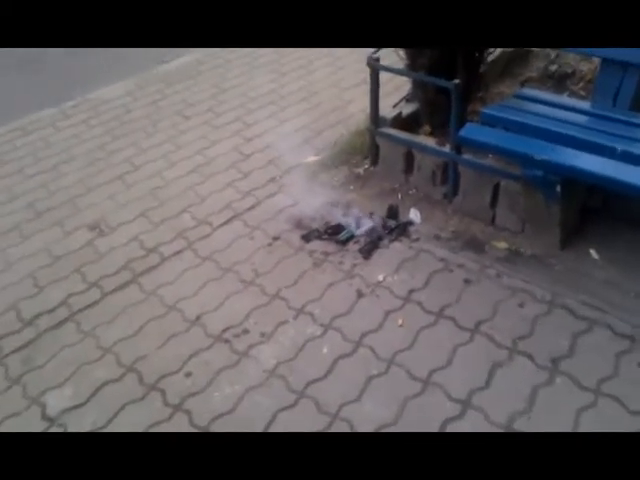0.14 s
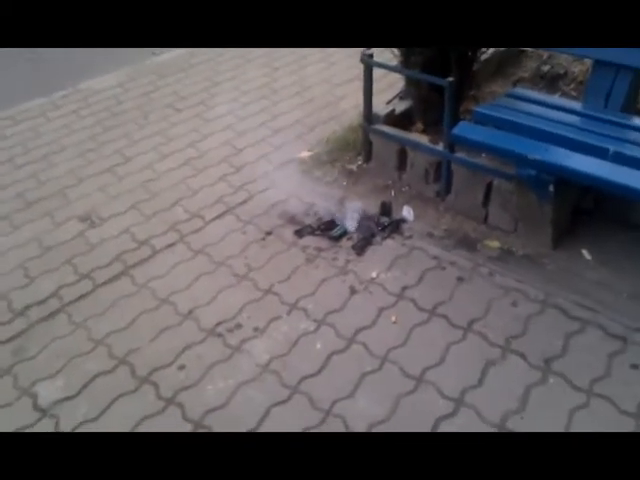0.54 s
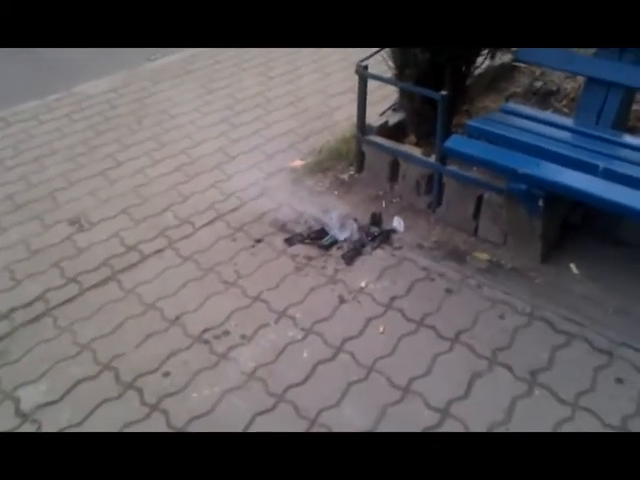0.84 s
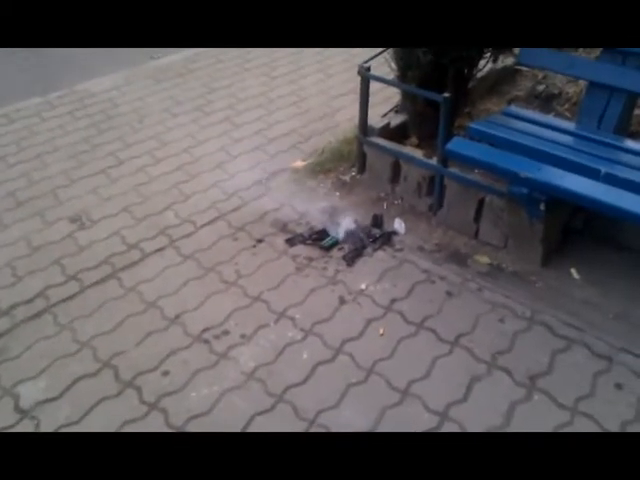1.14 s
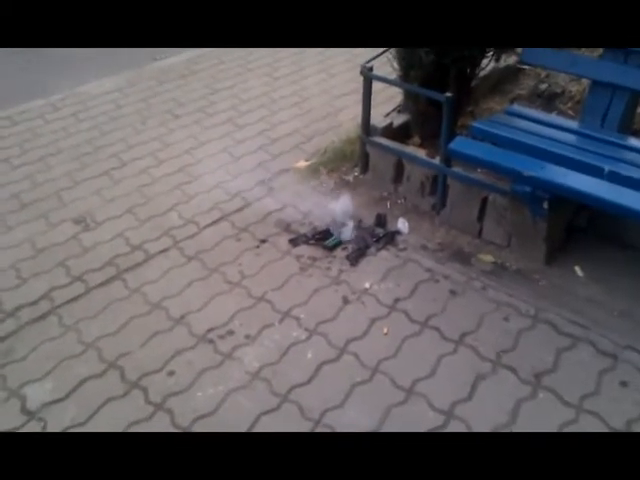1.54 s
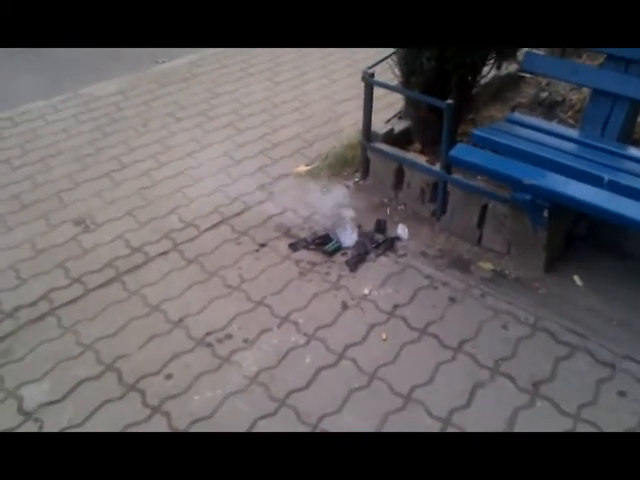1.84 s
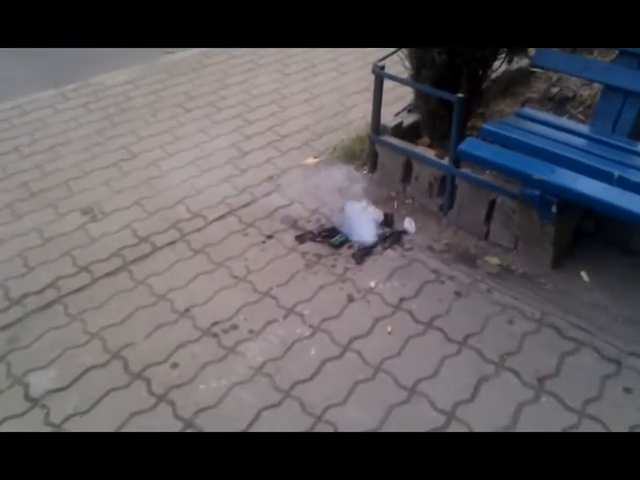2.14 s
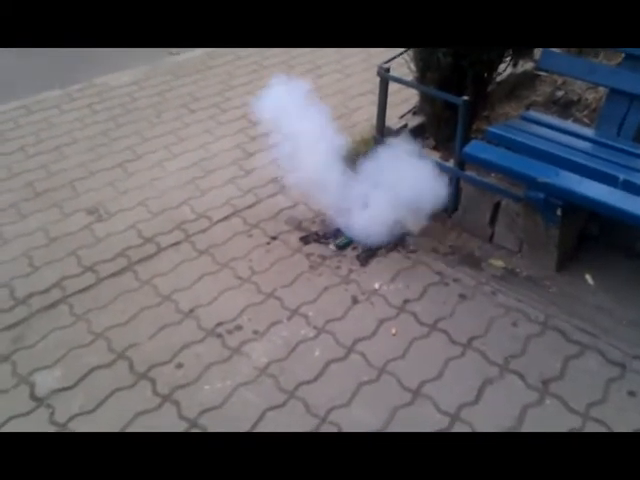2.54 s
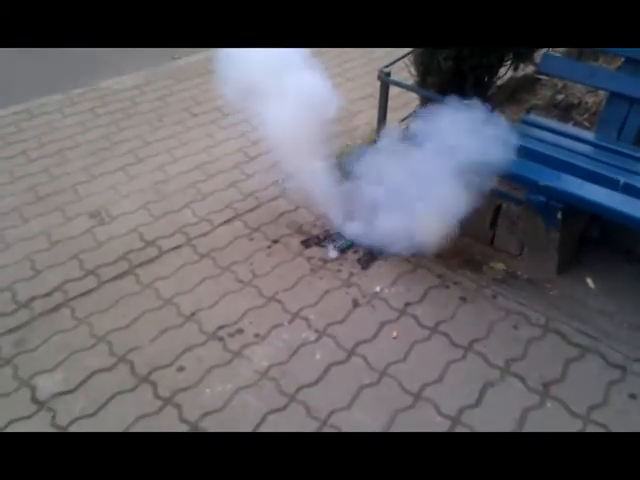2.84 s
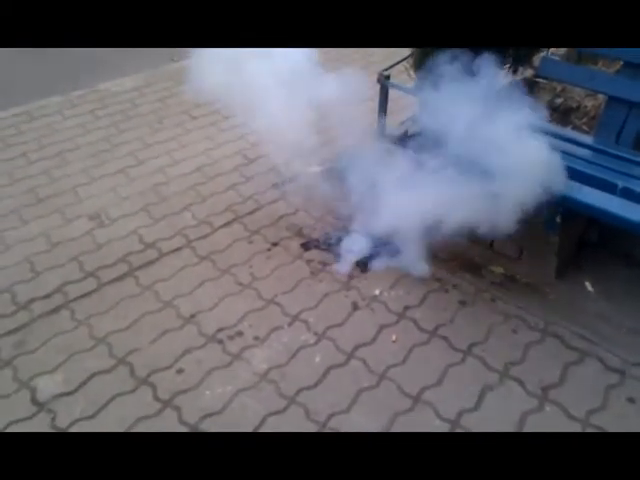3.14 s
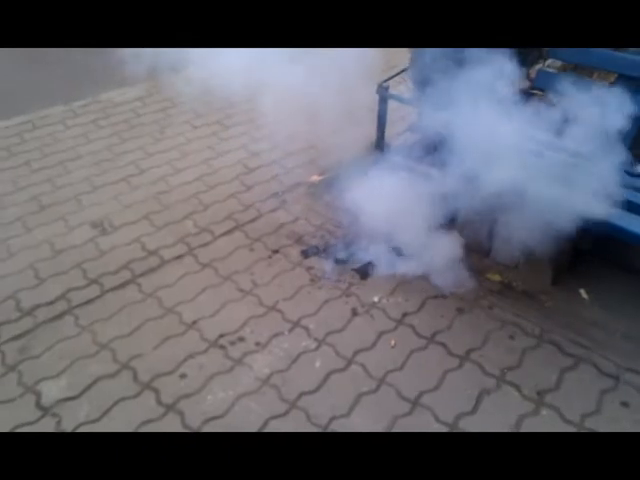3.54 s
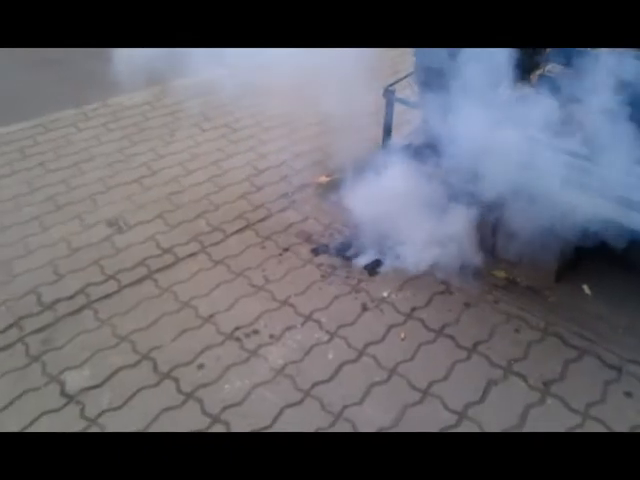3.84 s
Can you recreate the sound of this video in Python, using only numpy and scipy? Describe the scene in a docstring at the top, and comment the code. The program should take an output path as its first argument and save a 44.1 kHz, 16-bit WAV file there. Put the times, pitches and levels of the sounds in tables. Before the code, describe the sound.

A bright, spitting hiss of gas escapes from a burnt battery on the pavement, then fades steadily, dotted with brief pops. Underneath are a faint hum of far traffic and a slight wind rumble on the microphone.

```python
"""On outdoor paving, a smouldering battery vents gas in a sputtering jet that dies away. Turbulence gives a
hiss over a low roar, both roughened by spitting grit, and now and then a pop bursts out; nearby surfaces return
a short echo. The treble is wide, and a thin tone near 10.5 kHz follows its level. Far traffic hums behind, and
wind brushes the microphone, whose response peaks near 4.5 kHz."""
import sys
import numpy as np
from scipy import signal
from scipy.fft import rfft, irfft
from scipy.io import wavfile
from scipy.ndimage import uniform_filter1d, map_coordinates

SR = 44100
rng = np.random.default_rng(int(sys.argv[2]) if len(sys.argv) > 2 else 0)


def wav_out(sig):
    """Save sig, one row per channel (or a flat mono array), as 16-bit PCM at SR to the path in sys.argv[1]."""
    wavfile.write(sys.argv[1], SR, np.round(np.clip(np.atleast_2d(sig).T, -1, 1) * 32767).astype(np.int16))


N = 176400
TIME_S, BIN_HZ = np.arange(N) / SR, np.fft.rfftfreq(N, 1 / SR)

# Spectrum of the weak jet and of the pops' upper band: frequency_hz, gain_db
WEAK_JET_SPECTRUM = [(1060, -54), (1800, -14.5), (1900, -45), (1940, -12), (2120, -19), (2240, -11.5),
                     (2570, -9), (2630, -13.5), (2770, -7), (3120, -8.5), (3380, -5), (3600, -8),
                     (3710, -2.5), (3950, 3), (4180, -1.5), (4620, 2), (5040, -5), (5500, -3), (5820, -8),
                     (6720, -11), (8000, -25), (10400, -46), (17600, -120)]
# Spectrum of the roar and of the pops' lower band: frequency_hz, gain_db
ROAR_SPECTRUM = [(35, -65), (60, -18), (233, -5.5), (275, -9), (306, -5), (534, -9.5), (689, 1), (1040, -5),
                 (1680, -2), (2070, -8), (2200, -3), (2860, -24.5), (4840, -120)]


def vent(grit):
    """Turbulent mixing noise: one sputtering flow drives the hiss, the whistles and a low roar."""
    # Uneven decay of the flow: time_s, jet_level_db, roar_re_jet_db
    flow_levels = [(0.0, -16.5, -16), (0.052, -15.5, -19), (0.094, -21, -11.5), (0.122, -16.5, -20),
                   (0.17, -19.5, -14), (0.354, -14, -14.5), (0.42, -16, -18.5), (0.434, -14, -14),
                   (0.496, -15, -11), (0.738, -19, -19), (0.748, -22, -10.5), (0.794, -17, -15.5),
                   (0.822, -27, -15), (0.86, -20.5, -15.5), (0.912, -20.5, -20), (0.928, -22.5, -13),
                   (0.942, -17, -13.5), (1.012, -20.5, -17.5), (1.054, -18.5, -12.5), (1.15, -21, -18),
                   (1.164, -16, -12), (1.202, -24.5, -18), (1.264, -14.5, -12), (1.288, -27.5, -12),
                   (1.296, -17.5, -13), (1.472, -25, -13.5), (1.476, -22, -18), (1.538, -26, -10),
                   (1.58, -17.5, -17), (1.59, -25, -12.5), (1.7, -25.5, -16), (1.75, -27.5, -16.5),
                   (2.3, -28.5, -18.5), (2.76, -34, -16), (2.79, -37, -16), (2.94, -39.5, -13.5),
                   (2.986, -37.5, -27), (3.012, -39, -18), (3.346, -39.5, -18), (3.6, -42.5, -16),
                   (3.74, -44, -12), (3.758, -43, -12), (3.88, -43.5, -22)]
    jet_db, roar_db = curves(flow_levels)
    flow = amp(jet_db)
    jet = jet_hiss(flow, grit) + whistles(flow)
    roar = flow * amp(roar_db) * unit(patchy_noise(spread_db=1.1) + 1.1 * grit)
    return jet + coloured(roar, ROAR_SPECTRUM)


def jet_hiss(flow, grit):
    """Eddies radiate broadband noise, whose spectrum shifts as the flow weakens."""
    # Strong jet, including the microphone's peak near 4.5 kHz: frequency_hz, gain_db
    strong_spectrum = [(1060, -41), (1800, -40), (2080, -23), (2400, -10), (3140, -8), (3400, -3),
                       (3690, -2), (3880, 0), (4560, 4.5), (5100, 2.5), (8000, -23), (10400, -30),
                       (17600, -120)]
    hiss = flow * unit(patchy_noise(spread_db=1.5) + grit)
    weak = np.interp(TIME_S, (1.06, 1.9), [0, 1])
    return coloured(hiss * (1 - weak), strong_spectrum) + coloured(hiss * weak, WEAK_JET_SPECTRUM)


def whistles(flow, gain_db_per_s=2.6):
    """Narrowband noise is heard as pitch: three bands of the vent fade more slowly than the jet."""
    # Whistle bands: pitch_hz, width_hz, initial_level_re_jet_db
    bands = [(3850, 60, -21), (5480, 90, -27), (3320, 70, -30)]
    sound = np.zeros(N)
    for pitch_hz, width_hz, level_db in bands:
        peak = 1 / (1 + ((BIN_HZ - pitch_hz) / (width_hz / 2)) ** 2)
        band = unit(irfft(rfft(rng.standard_normal(N)) * peak, N))
        sound += flow * amp(level_db + gain_db_per_s * TIME_S) * band
    return sound


def grit_spits(rate_per_s=500, decay_s=.0003):
    """Shot noise: grit thrown out at random instants makes tiny bursts of very unequal size."""
    onsets = rng.random(N) < rate_per_s / SR
    size_db = 3.5 * np.minimum(rng.exponential(size=N), 4.5)
    envelope = signal.fftconvolve(onsets * amp(size_db), np.exp(-TIME_S[:200] / decay_s))[:N]
    return unit(envelope * rng.standard_normal(N))


def fizz(grit, tone_hz=10499, right_lag_rad=.96):
    """Interaural differences of phase and level spread the vent's treble; a thin tone follows its level."""
    # Decay of the treble: time_s, level_db
    levels = [(0.0, -30), (0.21, -30), (0.34, -26), (0.42, -31), (0.43, -25.5), (0.63, -33), (0.89, -34),
              (0.98, -29), (0.99, -34.5), (1.07, -30.5), (1.15, -35.5), (1.16, -31), (1.19, -39),
              (1.25, -32.5), (1.53, -40), (1.57, -37), (1.63, -39), (2.43, -44.5), (2.87, -53),
              (3.41, -54.5), (3.77, -62), (4.0, -59)]
    # Treble of the strong flow: frequency_hz, gain_db
    bright_spectrum = [(4590, -48), (7800, -1.5), (8170, -8), (9140, 3), (10300, 2), (12200, -8),
                       (13600, -5), (14400, -19.5)]
    # Treble of the dying flow: frequency_hz, gain_db
    dull_spectrum = [(4590, -35), (7800, -6), (8210, -5.5), (10400, 1), (11300, -10), (13700, -14),
                     (14400, -14)]
    # Bands in antiphase at the two ears: frequency_hz, gain_db
    side_spectrum = [(7200, -56), (7350, -1), (8600, 11), (9100, -22), (9200, -52), (9550, -55), (9700, -7),
                     (10500, 14.5), (11350, 4), (11500, -94)]
    envelope = amp(curves(levels)[0])
    sizzle = envelope * unit(patchy_noise(spread_db=2.3) + 0.25 * grit)
    dull = np.interp(TIME_S, (1.7, 4.2), [0, 1])
    mid = coloured(sizzle * (1 - dull), bright_spectrum) + coloured(sizzle * dull, dull_spectrum)
    side = coloured(envelope * amp(-6.5) * patchy_noise(spread_db=2.5), side_spectrum)
    phase = 2 * np.pi * tone_hz * TIME_S
    tone = np.array([np.sin(phase), amp(4.5) * np.sin(phase - right_lag_rad)])
    return mid + np.array([side, -side]) + envelope * amp(-11.5) * tone


def pops(rise_s=.0005, crack_s=.002, puff_s=.012):
    """A brief transient is broadband: each pop has a sharp crack, a ragged puff and a low push."""
    # Pops of the vent: start_s, level_db, low_band_re_level_db
    events = [(0.4324, -9.5, -5.5), (0.4362, -6.5, -22), (0.446, -9.5, -10), (0.5064, -9, -23),
              (0.5531, -19, -23), (0.5658, -15, -18), (0.843, -13, -7.5), (0.9264, -10.5, -16),
              (1.0532, -14.5, -10.5), (1.3588, -12.5, -14.5), (1.478, -13.5, -13.5), (1.5405, -20, -7),
              (2.0624, -28, -15), (2.7397, -22, -14), (2.8758, -26.5, -10.5), (2.917, -28, -8.5),
              (3.1477, -28, -17), (3.658, -30.5, -8.5), (3.6675, -27, -14), (3.6814, -39, -15),
              (3.921, -25.5, -9.5), (3.9334, -32, -15)]
    # Low push of a pop: frequency_hz, gain_db
    push_spectrum = [(40, -10), (120, 13), (350, 0), (900, -9), (2500, -32)]
    high, low, push = np.zeros((3, N))
    for start_s, level_db, low_db in events:
        age_s = np.maximum(TIME_S - start_s, 0)
        decay = np.exp(-age_s / crack_s) + amp(-12) * np.exp(-age_s / puff_s)
        envelope = amp(level_db) * (1 - np.exp(-age_s / rise_s)) * decay
        high += envelope
        low += envelope * amp(low_db)
        push[round(start_s * SR)] = amp(level_db + low_db + 3)
    ragged = amp(2.9 * wobble(270)) * np.sign(rng.standard_normal(N))
    bursts = coloured(high * ragged, WEAK_JET_SPECTRUM) + coloured(low * ragged, ROAR_SPECTRUM)
    return bursts + coloured(push, push_spectrum)


def yard_echo(direct, t60_s=.18, gap_s=.003, level_db=-5):
    """Reflections from paving, kerb and bench merge into a short, exponentially decaying tail."""
    # Small surfaces return little bass: frequency_hz, gain_db
    spectrum = [(300, -25), (1200, 0), (20000, 0)]
    t = TIME_S[:int(t60_s * SR)]
    tail = (t > gap_s) * amp(-60 * t / t60_s) * coloured(rng.standard_normal(N), spectrum)[:len(t)]
    response = amp(level_db) * tail / np.linalg.norm(tail)
    response[0] = 1  # direct path
    return signal.fftconvolve(direct, response)[:N]


def traffic():
    """Distant vehicles add incoherently into a low, gently wavering hum."""
    # Far traffic: frequency_hz, gain_db
    spectrum = [(15, -65), (25, -20), (71, -0.5), (108, -5.5), (209, -10), (271, -20), (389, -11),
                (1610, -12), (3000, -18.5), (3900, -41), (6600, -120)]
    return amp(-53 + 1.6 * wobble(3.38)) * coloured(patchy_noise(spread_db=1.8), spectrum)


def wind():
    """Turbulent pressure fluctuations on the microphone are heard as a low rumble."""
    # Gusts: time_s, level_db
    gusts = [(0.0, -63), (0.07, -45), (0.1, -56), (1.2, -61), (1.35, -48), (1.51, -60), (1.56, -46.5),
             (1.86, -47), (1.96, -62), (2.25, -49), (2.47, -56), (4.0, -57)]
    # Wind rumble: frequency_hz, gain_db
    spectrum = [(10, -19), (30, 0), (55, -8), (100, -27)]
    return amp(curves(gusts)[0] + 2.2 * wobble(8.2)) * coloured(rng.standard_normal(N), spectrum)


def amp(db):
    """Amplitude ratio of a level in decibels."""
    return 10 ** (np.asarray(db) / 20)


def unit(x):
    """Normalisation to an rms of 1."""
    return x / np.sqrt(np.mean(x ** 2) + 1e-20)


def curves(rows):
    """Linear interpolation, to one value a sample, of each column after the time."""
    times_s, *columns = np.transpose(rows)
    return [np.interp(TIME_S, times_s, column) for column in columns]


def wobble(knots_per_s):
    """Smooth random modulation: a spline through Gaussian knots."""
    knots = rng.standard_normal(int(N * knots_per_s / SR) + 4)
    return map_coordinates(knots, [TIME_S * knots_per_s])


def coloured(x, spectrum, size=8192):
    """Minimum-phase filtering by (frequency_hz, gain_db) points; white noise keeps its level."""
    hz, db = np.transpose(spectrum)
    grid_hz = np.fft.rfftfreq(size, 1 / SR)
    gain_db = np.interp(np.log(grid_hz + 1), np.log(hz + 1), np.maximum(db, -70))
    cepstrum = irfft(np.log(amp(gain_db)))
    cepstrum[1:size // 2] *= 2  # folding onto positive time makes the filter causal
    cepstrum[size // 2 + 1:] = 0
    response = irfft(np.exp(rfft(cepstrum)))
    return signal.fftconvolve(x, response / np.linalg.norm(response))[:N]


def patchy_noise(spread_db):
    """White noise of rms 1, modulated by random patches of gain in time and frequency."""
    cells = signal.stft(rng.standard_normal(N), nperseg=512)[2]
    patches = uniform_filter1d(rng.standard_normal(cells.shape), size=4, axis=0)
    patches = uniform_filter1d(patches, size=10, axis=1)
    return unit(signal.istft(cells * amp(spread_db * unit(patches)), nperseg=512)[1][:N])


def scene():
    """Superposition of the echoing vent and pops, the wide treble, traffic and wind."""
    grit = amp(-4 - 2 * TIME_S) * grit_spits()  # fades 2 dB a second against the turbulence
    centre, treble = vent(grit), fizz(grit)
    return yard_echo(centre + pops()) + treble + traffic() + wind()


def record(dry, ceiling=.94, band_limit_hz=14500):
    """Saturation rounds the loudest peaks; a low-pass removes all above the band limit."""
    clipped = dry / (1 + np.abs(dry / ceiling) ** 8) ** (1 / 8)
    return irfft(rfft(clipped) * (BIN_HZ < band_limit_hz), N)


dry = scene()
out = record(dry)
wav_out(out)
```